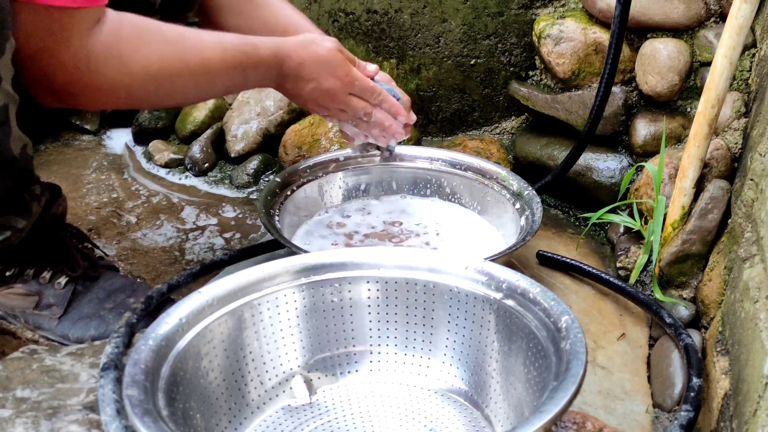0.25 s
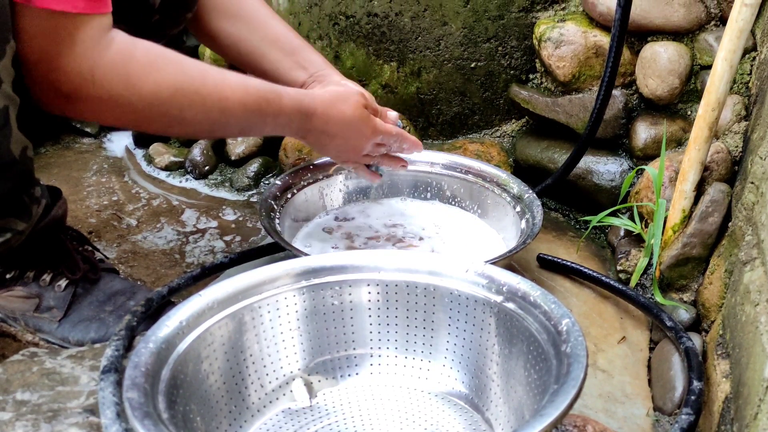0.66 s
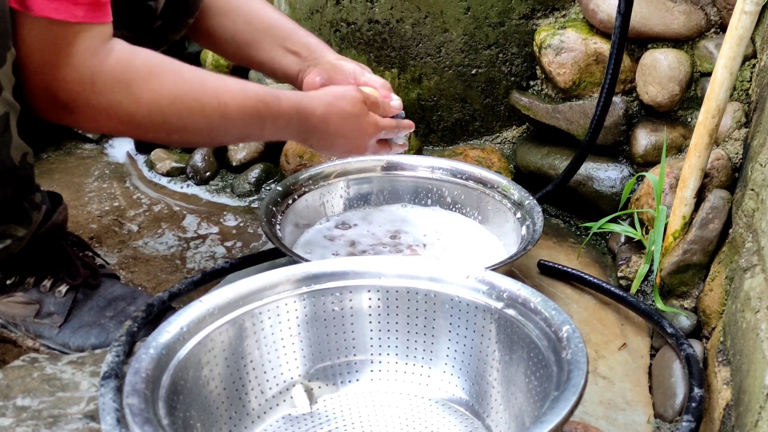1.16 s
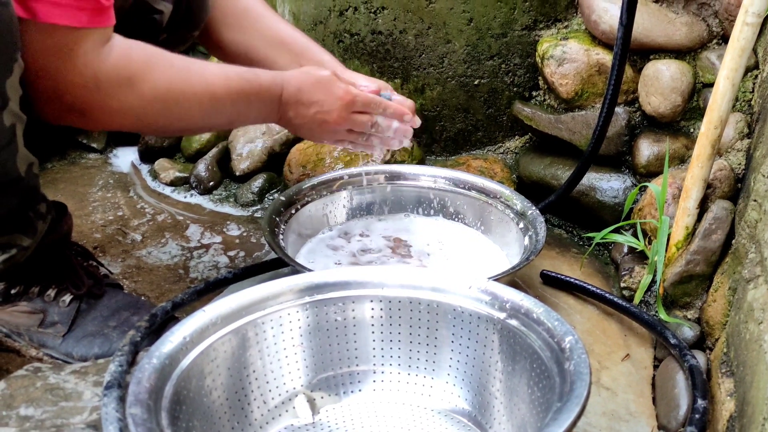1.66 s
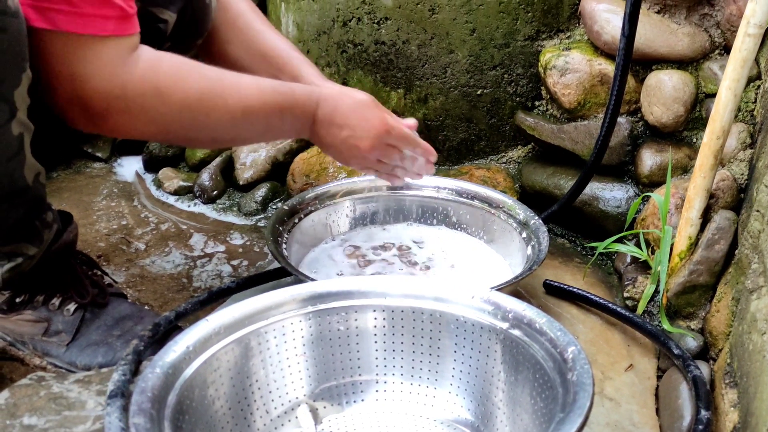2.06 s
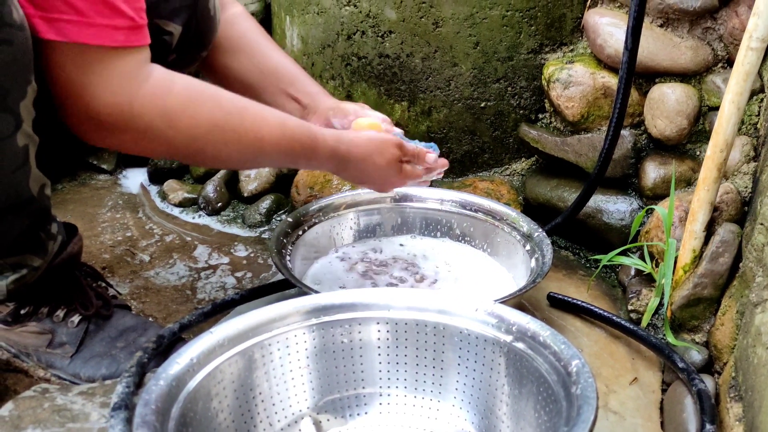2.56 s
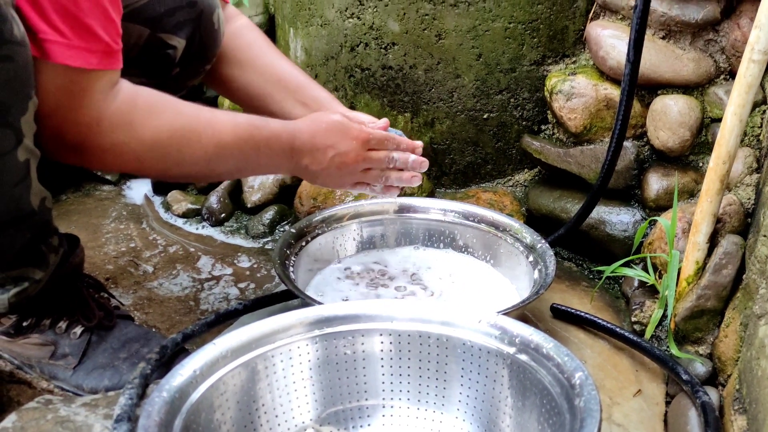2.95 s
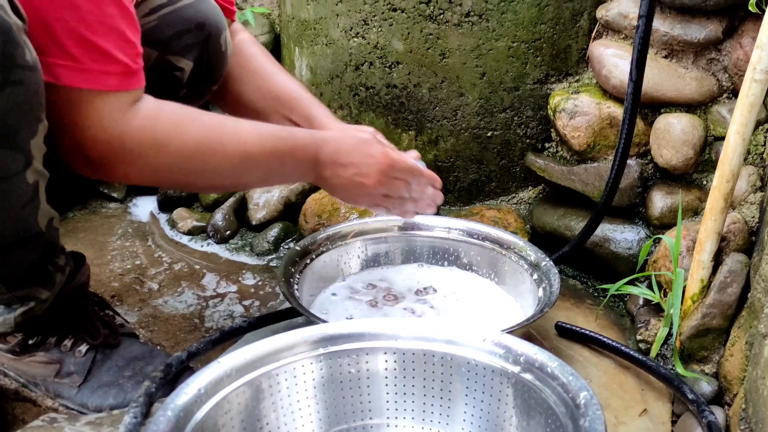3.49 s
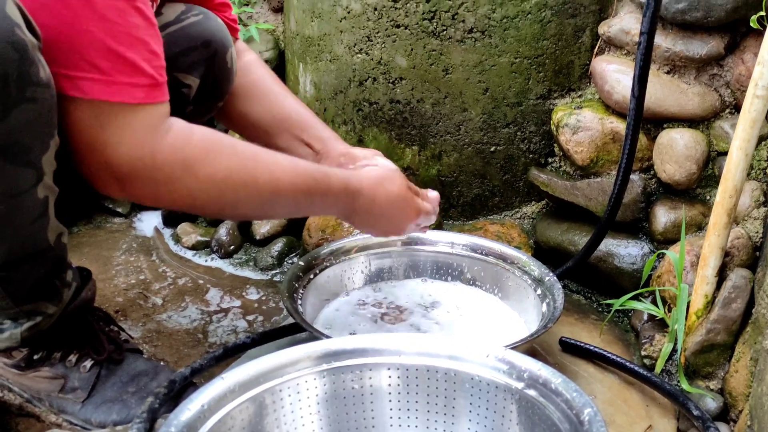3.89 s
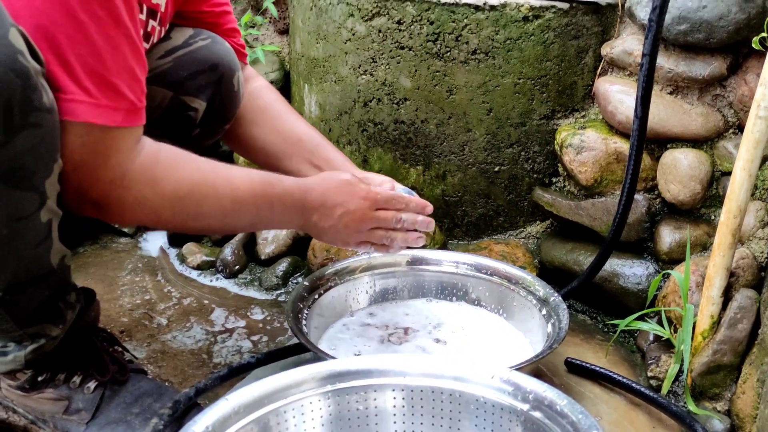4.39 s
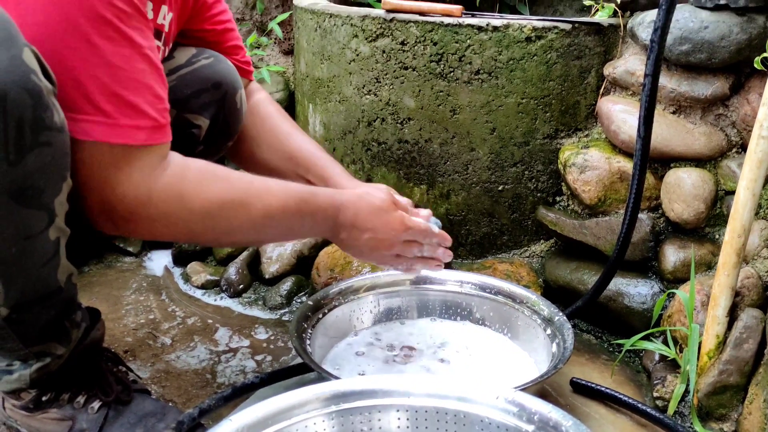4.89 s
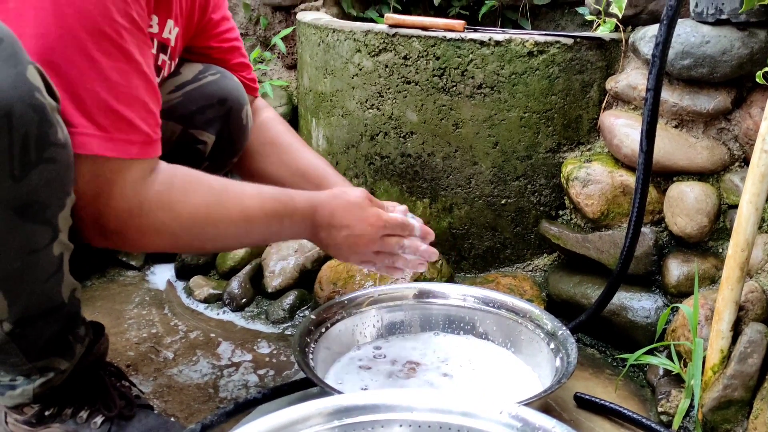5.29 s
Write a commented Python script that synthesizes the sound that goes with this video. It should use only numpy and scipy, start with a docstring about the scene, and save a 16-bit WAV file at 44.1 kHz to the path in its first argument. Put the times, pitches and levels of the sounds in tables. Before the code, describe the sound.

A scouring pad scrubs something small in soapy hands over steel bowls, in quick, scratchy, foamy strokes. It eases off twice and pauses briefly, with a few sharp catches, soft squelches and one small tap. Crickets buzz steadily around the yard, and a close one trills loudly twice, near the middle and near the end. A low rumble and faint hiss of air lie underneath.

```python
"""A scouring pad scrubs something small in soapy hands over steel bowls, about seven strokes a second.
Its friction noise and bursting foam resonate in the hands and bowls, with catches, squelches and a tap.
Crickets in the yard stridulate: a near one trills twice, farther ones buzz in turn over a chorus.
A low rumble and a hiss of air lie under everything.
The treble of the two channels is unevenly coloured, with deep notches on the left."""
import sys
import numpy as np
from scipy import signal
from scipy.fft import rfft, irfft, next_fast_len
from scipy.io import wavfile
from scipy.ndimage import uniform_filter1d, map_coordinates

SR = 44100
rng = np.random.default_rng(int(sys.argv[2]) if len(sys.argv) > 2 else 0)


def unload_wav(signal):
    """Save mono or channel-first audio to the path in sys.argv[1] as 16-bit WAV at rate SR, clipped to [-1, 1]."""
    wavfile.write(
        sys.argv[1],
        SR,
        np.round(np.clip(np.atleast_2d(signal).T, -1, 1) * 32767).astype(np.int16),
    )


N = 244314

# noise spectra of insects, rumble, open air and pad friction: frequency_hz, relative_density_db
CHORUS_SPECTRUM = [(5500, -22), (6200, -5.5), (6900, 5.5), (7300, -1.5), (7900, 9.5), (8600, -11),
                   (9500, -27), (10500, -48)]
RUMBLE_SPECTRUM = [(20, -46), (34, -35), (45, -23), (60, -18.5), (72, -10), (100, -4), (120, 0.5),
                   (145, -3.5), (175, -8), (222, -9), (395, -20), (531, -25), (900, -33), (1500, -64.5)]
AIR_SPECTRUM = [(100, -12), (300, 2), (700, -1), (1400, 0), (2000, -5.5), (5500, -11), (9000, -18),
                (15400, -24.5)]
FRICTION_SPECTRUM = [(100, -62), (300, -4.5), (550, 0), (1000, -4), (1500, 1), (2200, -7.5), (4000, 0.5),
                     (5300, -4.5), (7000, -1), (9000, -5), (12000, -19), (15400, -24)]
# envelope of the rumble: time_s, level_db
RUMBLE_ENVELOPE = [(0, -45.5), (4.2, -46), (4.7, -44.5), (5.54, -46.5)]
# left-right likeness of the background: frequency_hz, coherence
BACKGROUND_COHERENCE = [(60, 0.92), (130, 0.96), (290, 0.62), (640, 0.15), (1400, 0.016), (15000, 0.022)]
# far crickets: start_s, end_s, chirps_per_s, pitch_hz, start_db, end_db, pan_db, phase_spread_rad
FAR_CALLS = [(.003, 1.29, 58, 7214, -55.5, -55, 2.5, 0.72),
             (1.499, 2.434, 85, 7190, -57.5, -54.5, 4.5, 0.88), (2.4523, 3.27, 60, 7304, -51, -48, 2, 0.99),
             (2.951, 3.494, 62, 6910, -51, -51, 0.5, 1.8), (3.7, 5.543, 50, 7300, -59, -55, 4.5, 0.9),
             (0.597, 1.457, 69, 8150, -69, -61.5, 0, 1.05), (1.801, 2.418, 48, 8040, -58, -55, -4, 0.91),
             (3.295, 3.984, 62, 8090, -64.5, -66.5, -11, 0.49),
             (4.848, 5.447, 50, 8010, -63, -57.5, -5.5, 0.71)]
# near cricket: start_s, end_s, pulses_per_s, left_lag_s, pitch_hz, full_db
NEAR_TRILLS = [(2.2886, 2.92, 92.5, .000231, 6400, -34), (4.6729, 5.325, 92.45, .00018, 6420, -35.5)]
# air squeezed from the palms: start_s, level_db, pitch_hz
PALM_SQUELCHES = [(3.612, -52.5, 476), (5.078, -54, 525), (5.176, -57, 533), (5.354, -56, 530)]
# modes of the tapped object: frequency_hz, gain_db
TAP_RESONANCES = [(4290, 0), (5670, -9), (6150, -10), (2940, -10), (5160, -11), (6650, -12), (8470, -17),
                  (9360, -16), (12200, -24)]
# hard catches of the pad: start_s, level_db, centre_hz, decay_s, pan_db, rasp_db
PAD_CATCHES = [(0.228, -53.5, 2400, 0.046, 1, -17), (1.607, -49.5, 4030, 0.046, -5, 19),
               (2.1915, -38.5, 6000, .014, 3.5, -3), (2.191, -47, 1480, .012, 0, -15),
               (2.475, -46.5, 1730, 0.016, -5, -16), (3.613, -43, 1400, .012, 0, -4),
               (3.937, -58, 2480, 0.025, 1, -5), (5.083, -51.5, 1330, 0.042, 1, -11),
               (5.356, -49, 3600, 0.02, 7, 0)]
# resonances of the cupped hands and the bowls: centre_hz, width_hz, strength_db
CAVITY_MODES = [(535, 130, 5), (930, 31, 16.5), (1216, 62, 11.5), (1741, 27, 10), (2306, 26, 9.5),
                (2860, 16, 15), (3510, 31, 10), (4270, 230, -0.5)]
# strokes of the pad: middle_s, length_s, level_db, brightness_db
PAD_STROKES = [(0.081, 0.13, -47, 0), (0.223, 0.13, -46.5, 1), (0.343, 0.12, -48, 0.5),
               (0.495, 0.15, -54.5, 1), (0.82, 0.13, -60.5, -7), (0.927, 0.085, -62, 3),
               (1.04, .087, -60.5, 6), (1.327, .24, -58.5, 2), (1.605, 0.2, -49.5, 1),
               (1.761, .15, -50.5, 3.5), (1.901, 0.15, -49, -3), (2.045, 0.13, -54, 1),
               (2.195, 0.11, -46.5, -0.5), (2.34, 0.17, -51.5, -1), (2.485, 0.14, -48, -2.5),
               (2.592, 0.1, -56.5, 6), (2.794, 0.43, -64, 4), (3.174, 0.12, -56.5, 4),
               (3.334, 0.2, -51, -4), (3.493, 0.14, -49, -3.5), (3.622, 0.13, -46.5, -2),
               (3.764, 0.16, -49.5, -0.5), (3.916, 0.16, -47, -2), (4.653, 0.27, -54, -1.5),
               (4.814, 0.14, -50, 1), (4.949, 0.16, -50, -2), (5.095, 0.13, -49.5, 1),
               (5.225, 0.13, -47.5, -1.5), (5.375, 0.12, -49, -1.5), (5.505, 0.13, -51.5, -3)]
# uneven treble colouring of the left and right channels: frequency_hz, gain_db
LEFT_COLOURING = [(3000, 0.5), (5500, 5), (8100, -7), (8600, -21), (10300, 3.5), (11300, -24), (11800, 7)]
RIGHT_COLOURING = [(3000, 0.5), (5500, 2), (8100, -4), (8600, 10.5), (10300, 5), (11300, 1.5), (11800, 8.5)]


def amp(db):
    """Amplitude ratio of a level in decibels."""
    return 10 ** (np.asarray(db) / 20)


def unit(x):
    """Normalisation to rms 1."""
    return x / np.sqrt(np.mean(x ** 2) + 1e-20)


def along(points, hz):
    """Interpolation of (frequency_hz, value) points on a log frequency axis."""
    f, v = np.transpose(points)
    return np.interp(np.log(hz + 1), np.log(f + 1), v)


def wobble(rate):
    """Smooth random modulation: a spline through rate knots a second."""
    return map_coordinates(rng.standard_normal(int(N * rate / SR) + 4), [np.arange(N) * rate / SR])


def filtered(x, response):
    """Linear filtering: the spectrum of x times a frequency response."""
    m = next_fast_len(N + SR // 2)
    return irfft(rfft(x, m) * response(np.fft.rfftfreq(m, 1 / SR)), m)[..., :N]


def patchy_noise(depth_db):
    """Comodulation: two white noises share patches of random gain in time and frequency."""
    spectra = signal.stft(rng.standard_normal((2, N)), nperseg=256)[2]
    patches = uniform_filter1d(rng.standard_normal(spectra.shape[1:]), size=5, axis=0)
    patches = uniform_filter1d(patches, size=8, axis=1)
    return signal.istft(spectra * amp(depth_db * unit(patches)), nperseg=256)[1][:, :N]


def stereo_noise(pair, spectrum, coherence):
    """Partial coherence: two noises are coloured and mixed as mid and side; rms 1."""
    def response(hz):
        angle = np.arccos(np.clip(along(coherence, hz), -1, 1)) / 2
        return amp(along(spectrum, hz)) * [np.cos(angle), np.sin(angle)]
    mid, side = filtered(pair, response)
    return unit(np.array([mid + side, mid - side]))


def echoes(x, t60):
    """Scattering from stones and leaves gives each microphone its own decaying tail."""
    t = np.arange(SR // 4) / SR
    tail = rng.standard_normal((2, len(t))) * amp(-60 * t / t60)
    return signal.fftconvolve(np.atleast_2d(x), tail / np.linalg.norm(tail[0]), axes=1)[:, :N]


def background():
    """Independent noises add in power: a far insect chorus, a rumble near mono and the hiss of air."""
    chorus_gain = amp(-54.5 + .29 * wobble(1.55))
    chorus = stereo_noise(patchy_noise(depth_db=.5), CHORUS_SPECTRUM, BACKGROUND_COHERENCE)
    rumble_gain = amp(np.interp(np.arange(N) / SR, *np.transpose(RUMBLE_ENVELOPE)))
    rumble = stereo_noise(rng.standard_normal((2, N)), RUMBLE_SPECTRUM, BACKGROUND_COHERENCE)
    air_gain = amp(-58.5 + .74 * wobble(2.66))
    air = stereo_noise(patchy_noise(depth_db=1.8), AIR_SPECTRUM, BACKGROUND_COHERENCE)
    return chorus_gain * chorus + rumble_gain * rumble + air_gain * air


def far_crickets(wander_hz=130):
    """Amplitude modulation cuts a wing tone into chirps of three pulses, blurred by scattering."""
    out, t = np.zeros((2, N)), np.arange(N) / SR
    for start, end, rate, pitch_hz, start_db, end_db, pan_db, spread in FAR_CALLS:
        beat = 2 * np.pi * rate * (t - start) + 1.2 * wobble(12)
        pulses = (1 + .65 * np.cos(beat - .3)) * (1 + .5 * np.cos(3 * beat))
        wander = np.cumsum(wander_hz * wobble(120)) / SR
        flutter = spread * (.55 * np.sin(3 * beat) + .85 * wobble(200))
        tone = np.sin(2 * np.pi * (pitch_hz * t + wander) + flutter)
        gate = uniform_filter1d(((t > start) & (t < end)) * 1., size=900)
        left, right = echoes(pulses * tone, t60=.022)
        level = amp(np.interp(t, [start, end], [start_db, end_db])) * gate
        out += amp([[pan_db / 2], [-pan_db / 2]]) * level * [unit(left), unit(right)]
    return out


def wing_stroke(t, hz, fall_hz=700, fall_s=.003):
    """Stridulation: one wing closing opens with a faint tick and falls in pitch as the file runs out."""
    lost_cycles = fall_hz * fall_s * np.where(t < 0, (t / fall_s) ** 2 / 2, np.log(np.cosh(t / fall_s)))
    phase = 2 * np.pi * (hz * t - lost_cycles)
    lobe = lambda centre_s, width_s=.0014: np.exp(-((t - centre_s) / width_s) ** 2)
    swell = .52 * lobe(-.003) + lobe(0) + .3 * lobe(.0028)
    tick = .07 * lobe(-.0025, width_s=.0006) * np.sin(2 * np.pi * 9300 * t)
    return swell * (np.sin(phase) + .012 * np.sin(2 * phase)) + tick


def trills(steady_s=.4755, slowing_hz_per_s=44, lead_in_s=.065, swell_s=.065):
    """A pulse train of wing strokes: a faint lead-in, a jump, a swell, then slowing to a sudden stop."""
    out, t = np.zeros((2, N)), np.arange(N) / SR
    drift_s = 4e-6 * wobble(14)  # moving air and leaves shift the path to the left microphone
    for start, end, rate, left_lag, wing_hz, full_db in NEAR_TRILLS:
        slowing_s = np.clip(t - start - steady_s, 0, end - start - steady_s)
        count = rate * (t - start) - slowing_hz_per_s / 2 * slowing_s ** 2
        beats = np.interp(np.arange(count[round(end * SR)]), count, t)
        swell_db = np.interp(beats - start - lead_in_s, [0, swell_s], [-10, 0])
        level_db = full_db + np.where(beats - start < lead_in_s, -14.5, swell_db)
        for beat, db, (jitter, size, pitch) in zip(beats, level_db, rng.standard_normal((len(beats), 3))):
            middle = round(beat * SR)
            span = slice(middle - 350, middle + 350)
            arrival = beat + .000143 * jitter + np.array([[left_lag + drift_s[middle]], [0]])
            out[:, span] += amp(db + .8 * size) * wing_stroke(t[span] - arrival, wing_hz + 50 * pitch)
    return out


def near_cricket(wall_db=-14, scatter_db=-9.5, cutoff_hz=5550):
    """Multipath propagation: the trills arrive directly, off a stone wall and by scattering."""
    direct = trills() * amp([[-.3], [.3]] + 1.5 * wobble(500))  # the file's teeth catch unevenly
    wall = np.roll(direct, 234, axis=1)  # a metre behind: each echo falls halfway to the next stroke
    blend = 1.5 * wobble(10)  # the scattering never repeats
    scattered = np.cos(blend) * echoes(direct[1], t60=.06) + np.sin(blend) * echoes(direct[1], t60=.06)
    heard = direct + amp(wall_db) * wall + amp(scatter_db) * scattered
    return filtered(heard, lambda hz: 1 / (1 + (cutoff_hz / (hz + 1)) ** 30))  # wings radiate no lows


def squelches(rise_s=.00087, t60=.085):
    """Cavity resonance: squeezed air gives a soft pop whose pitch rises a little as the palms close."""
    out, t = np.zeros(N + SR), np.arange(SR // 8) / SR
    for start, db, pitch_hz in PALM_SQUELCHES:
        pop = np.sin(2 * np.pi * pitch_hz * t * (1 + t)) * (1 - np.exp(-t / rise_s))
        out[round(start * SR):][:len(t)] += 2 * amp(db - 60 * t / t60) * pop
    return out[:N]


def tap(start_s=3.6105, length_s=.0062):
    """Modal ringing: one small hard impact, nearer the left, is quickly damped by the wet hands."""
    out, t = np.zeros((2, N)), np.arange(round(length_s * SR)) / SR
    ring = sum(amp(db) * np.sin(2 * np.pi * (hz * t + rng.random((2, 1)))) for hz, db in TAP_RESONANCES)
    crack = amp(-10) * uniform_filter1d(rng.standard_normal((2, len(t))), size=3)
    envelope = np.sqrt(np.sin(np.pi * t / length_s))
    out[:, round(start_s * SR):][:, :len(t)] = envelope * (ring + crack)
    return amp([[-34], [-36.5]]) * out


def resonance(hz, centre_hz, width_hz):
    """Lorentzian resonance curve of height 1."""
    return 1 / (1 + (2 * (hz - centre_hz) / width_hz) ** 2)


def catches(rise_s=.0008, top_hz=9500):
    """Stick-slip friction: the pad catches in a sudden burst, a narrow band on a broad rasp."""
    out, t = np.zeros((2, N + SR)), np.arange(SR // 8) / SR
    hz = np.fft.rfftfreq(len(t), 1 / SR)
    for start, db, centre_hz, decay_s, pan_db, rasp_db in PAD_CATCHES:
        noise = rng.standard_normal((3, len(t)))  # left, right, common
        colour = amp(rasp_db + along(FRICTION_SPECTRUM, hz)) + resonance(hz, centre_hz, .07 * centre_hz)
        colour /= 1 + (hz / top_hz) ** 24
        burst = unit(irfft(rfft(noise[:2] + 1.2 * noise[2]) * colour, len(t)))
        envelope = (1 - np.exp(-t / rise_s)) * np.exp(-(t / decay_s) ** 2.3)
        gain = amp([[db + pan_db / 2], [db - pan_db / 2]])
        out[:, round(start * SR):][:, :len(t)] += gain * envelope * burst
    return out[:, :N]


def foam(bubbles_per_s=1300, centre_hz=2800, decay_cycles=4.5):
    """Damped oscillation: bursting soap bubbles ring in slightly rising tones of random size; rms 1."""
    when, side, pitch, size = rng.random((round(bubbles_per_s * N / SR), 4)).T[..., None]
    offset = np.arange(SR // 150)
    hz = centre_hz * 2 ** (2.2 * (pitch - .5))
    age = hz * offset / SR / decay_cycles  # in decay times
    envelope = (1 - np.exp(-4 * age)) * np.exp(-age)
    tone = np.sin(2 * np.pi * decay_cycles * age * (1 + .04 * age))
    pops = amp(-2.5 * np.log(size + 1e-3)) * envelope * tone
    samples = ((when * N).astype(int) + offset).ravel()
    channels = [np.bincount(samples, (pops * heard).ravel(), N)[:N] for heard in (side < .5, side >= .5)]
    return unit(np.array(channels))


def scrubbing(foam_db=-5):
    """Source and filter: slipping fibres and foam excite cavities that shift as the hands move."""
    grit = amp(1.2 * wobble(500) + .7 * wobble(60))
    grains = unit(grit * patchy_noise(depth_db=2.8))
    friction = stereo_noise(grains, FRICTION_SPECTRUM, coherence=[(500, .3), (1200, 0), (5000, .1)])
    source = np.pad(friction + amp(foam_db) * foam(), ((0, 0), (0, SR)))
    out, t = np.zeros((2, N + SR)), np.arange(SR // 4) / SR
    hz = np.fft.rfftfreq(len(t), 1 / SR)
    for middle, length, db, bright_db in PAD_STROKES:
        # each mode has one pitch and strength as the stroke starts and another as it ends
        shifts = 1 + .045 * rng.standard_normal((len(CAVITY_MODES), 2, 1, 1))
        gains = amp(2 * rng.standard_normal((len(CAVITY_MODES), 2, 2, 1)))
        cavity = 1 + sum(gain * amp(mode_db) * resonance(hz, centre * shift, width)
                         for (centre, width, mode_db), shift, gain in zip(CAVITY_MODES, shifts, gains))
        body_db = -5 - .2 * middle  # the low body thins slightly as the work goes on
        tilt = amp(along([(800, body_db), (1200, 0), (2300, 0), (4000, bright_db)], hz))
        first = max(round((middle - length / 2) * SR), 0)
        opening, closing = unit(irfft(rfft(source[:, first:][:, :len(t)]) * cavity * tilt, len(t)))
        moved = np.clip(2 * t / length - .5, 0, 1)
        stroke = (1 - moved) * opening + moved * closing
        speed = np.sin(np.pi * np.clip(t / length, 0, 1)).clip(0) ** 1.09  # the hand speeds up and slows
        out[:, first:][:, :len(t)] += amp(db) * speed * stroke
    return amp([[.6], [-.6]]) * out[:, :N]


def scene():
    """Superposition of all sources at two spaced microphones."""
    return scrubbing() + catches() + tap() + squelches() + near_cricket() + far_crickets() + background()


def record(dry, top_hz=15330):
    """Spectral colouring: uneven treble in both channels, deeply notched on the left, and a band limit."""
    colouring = lambda hz: amp([along(LEFT_COLOURING, hz), along(RIGHT_COLOURING, hz)])
    return filtered(dry, lambda hz: colouring(hz) * (hz < top_hz))


dry = scene()
out = record(dry)
unload_wav(out)
```